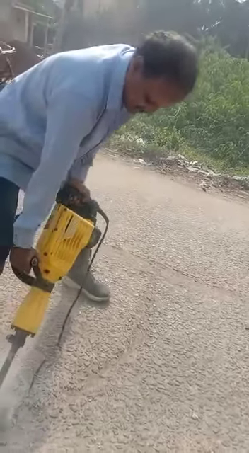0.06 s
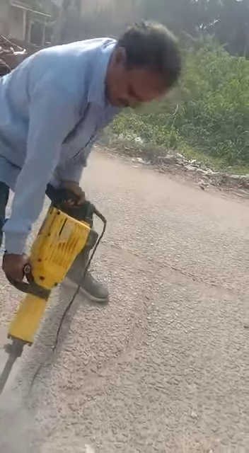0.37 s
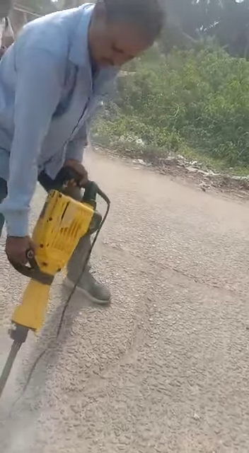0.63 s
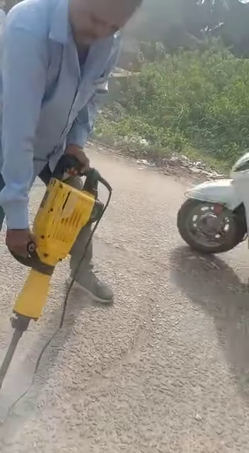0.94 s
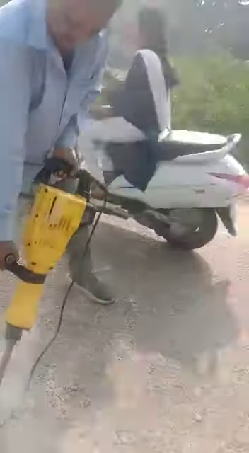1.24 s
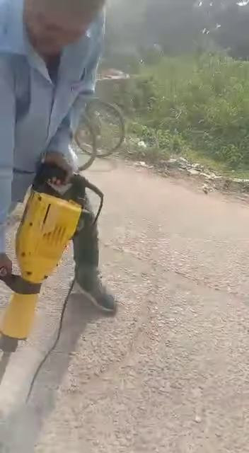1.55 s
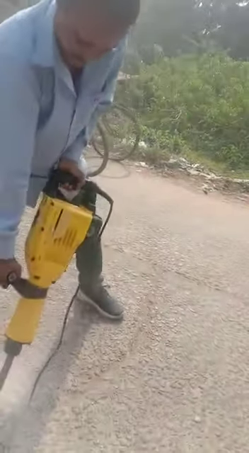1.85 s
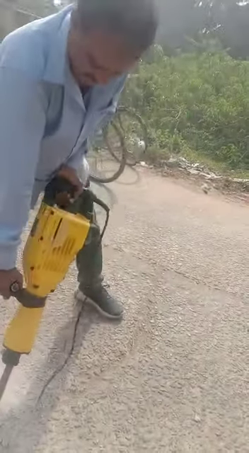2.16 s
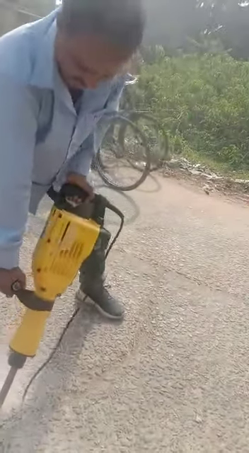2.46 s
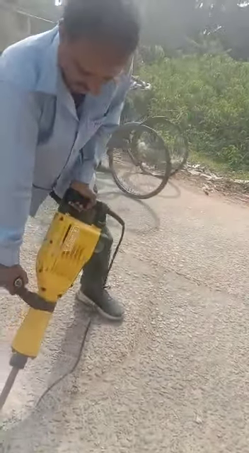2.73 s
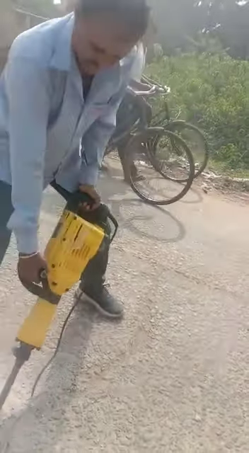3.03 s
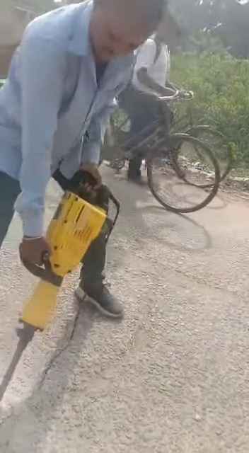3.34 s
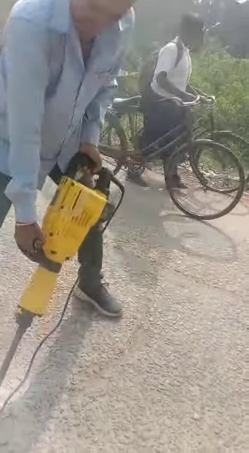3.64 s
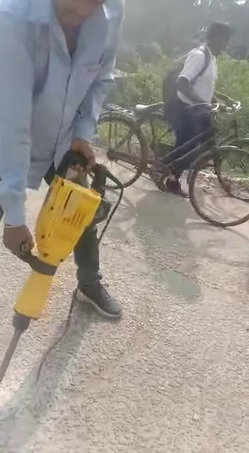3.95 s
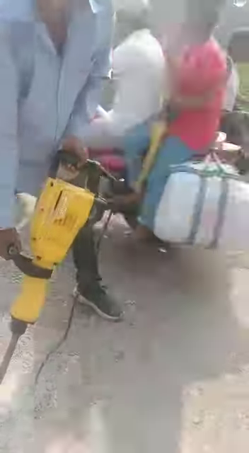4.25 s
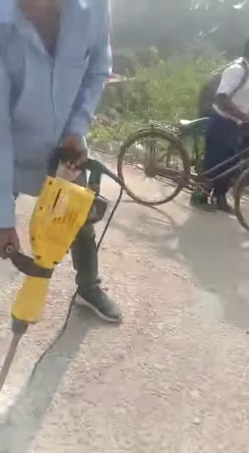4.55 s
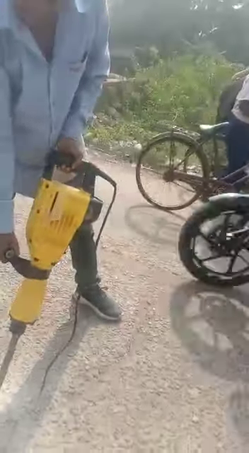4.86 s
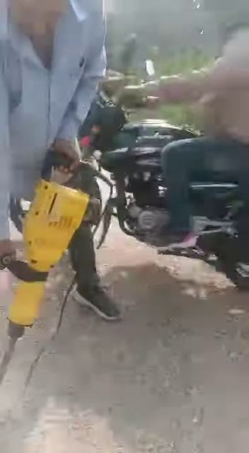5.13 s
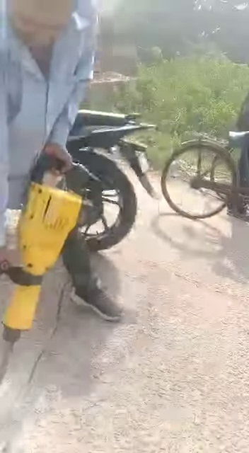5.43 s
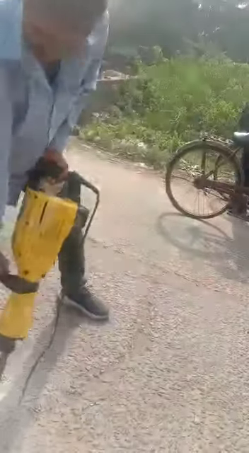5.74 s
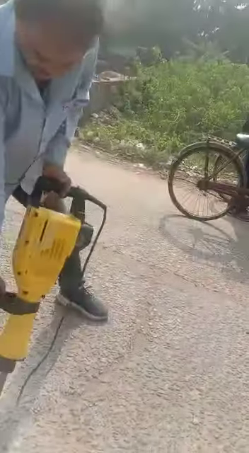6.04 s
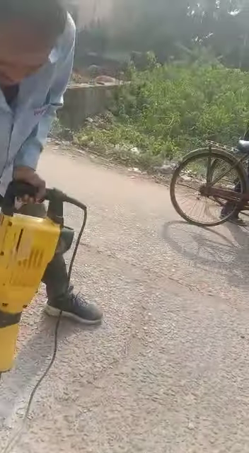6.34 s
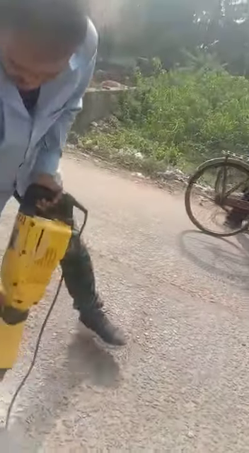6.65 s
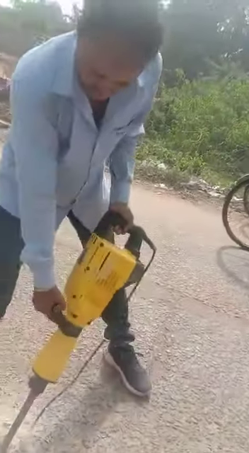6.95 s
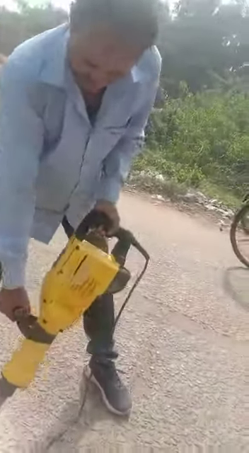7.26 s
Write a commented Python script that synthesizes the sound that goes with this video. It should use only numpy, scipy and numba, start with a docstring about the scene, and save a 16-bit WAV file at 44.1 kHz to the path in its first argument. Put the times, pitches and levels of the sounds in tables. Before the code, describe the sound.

An electric demolition hammer pounds a road in three rapid bursts, its motor whirring and chisel rattling between them, as motorcycles pass faintly.

```python
"""An electric demolition hammer pounds a road, a step or two from a phone's microphone.
Leaned on, the chisel strikes about 20 times a second: the ground thuds, grit crunches, the steel rings.
Eased off after each of three bursts, the motor speeds up, the housing hums and the loose chisel
rattles in its holder. Out in the street, scooters and motorcycles roll by with booming exhausts."""
import sys
import numpy as np
from scipy import signal
from scipy.fft import rfft, irfft, next_fast_len
from scipy.io import wavfile
from scipy.ndimage import uniform_filter1d, minimum_filter1d, map_coordinates
from numba import njit

SR = 44100
rng = np.random.default_rng(int(sys.argv[2]) if len(sys.argv) > 2 else 0)


def master(y):
    """Save y as 16-bit WAV."""
    cut = np.clip(np.atleast_2d(y).T, -1, 1)
    pcm = np.round(cut * 32767)  # scale
    wavfile.write(sys.argv[1], SR, pcm.astype(np.int16))


N = 321489
TIME = np.arange(N) / SR
STRIKE = np.arange(4096) / SR  # seconds into one blow
LOADED_HZ, FREE_HZ = 19.3, 26.8  # piston rate under load and running free
BOUNCE_S = 0.0067  # usual time the chisel rings clear after a blow

# Three bursts of hammering, first blow to last. Each row: time in seconds, blows per second.
FIRST_BURST = [(.022, 18.62), (.181, 18.43), (.287, 20.1), (.447, 17.55)]
SECOND_BURST = [(1.445, 22.96), (1.564, 26.98), (1.806, 22.95), (1.891, 24.23), (2.115, 20.26),
                (2.164, 21.75), (2.308, 19.4), (2.515, 19.49), (2.566, 18.09), (2.878, 20.77),
                (3.041, 15.75)]
THIRD_BURST = [(5.042, 26.3), (5.339, 27.48), (5.377, 26.38), (5.417, 22.58), (5.501, 24.78), (5.86, 20.09),
               (5.903, 23.88), (6.083, 21.08), (6.281, 19.17), (6.641, 19.78), (6.898, 19.15)]
BURSTS = [FIRST_BURST, SECOND_BURST, THIRD_BURST]
# How the loose chisel hangs. Each row: time in seconds, rattle and jangle offsets in dB,
# lower resonance in dB, upper resonance in Hz, its level in dB.
HANG = [(.55, -2.5, -0.5, -29, 3150, -27.5), (1, -0.5, -2, -27.5, 3280, -21.5),
        (1.4, 1.5, -1, -37, 2800, -32.5), (3.15, -0.5, -0.5, -29.5, 3150, -31),
        (3.6, 1, -1.5, -25, 3250, -37), (3.9, -1, -2.5, -31, 3020, -20.5), (4.1, 1, -3.5, -32, 3130, -30),
        (4.3, -4, -1, -32, 2580, -25), (4.65, -1, -0.5, -32, 2680, -26.5), (5, -1, -1, -30, 2570, -27),
        (7.05, -5, -1, -40, 3030, -22.5), (7.29, 2.5, -2.5, -46, 3030, -23)]
# Tone of the chisel's rattle and its brighter jangle. Each row: frequency in Hz, gain in dB.
RATTLE_TONE = [(1400, -13), (1850, -2.5), (2050, 0), (2230, 0.5), (2500, 1.5), (2900, 4.5), (3300, 4.5),
               (3800, 4.5), (4350, -2.5), (5200, -8.5)]
JANGLE_TONE = [(3700, -23.5), (4600, -2), (5050, 2.5), (5380, 7.5), (5850, 3), (6300, -6.5), (6720, -0.5),
               (7000, -8.5), (7500, -9.5), (8100, -23), (9000, -21.5), (9450, -16), (10200, -23),
               (12500, -36.5), (15300, -56)]


def chiselling():
    """Every blow drives the steel into the road; no two bite in quite the same way."""
    # Each row: time in seconds, relative force in dB, ground thud in dB.
    bite = [(.022, -2.5, -29.5), (.077, -1.5, -25), (.18, 0, -33.5), (.27, -3.5, -40), (.338, -1.5, -43),
            (.392, 1, -24), (.446, -4.5, -55), (1.446, -2, -25.5), (1.53, -5, -43), (1.6, -2, -32),
            (1.85, -0.5, -32.5), (1.97, 2.5, -27.5), (2.07, 0.5, -31.5), (2.18, 1, -24), (2.28, -2, -29),
            (2.37, 1, -24.5), (2.55, 4, -23.5), (2.676, 1, -32), (2.9, 3, -23), (3.04, -3.5, -35),
            (5.04, -2.5, -44), (5.16, -2.5, -38), (5.34, -5, -37), (5.378, 1.5, -30.5), (5.43, -8, -32),
            (5.52, 2.5, -40), (5.63, -1, -26.5), (5.81, -0.5, -30), (5.86, -10, -52), (5.95, -2.5, -34),
            (6.1, 2, -25.5), (6.43, -1, -25.5), (6.487, 3, -21), (6.54, -1, -27.5), (6.72, 1, -24.5),
            (6.9, -.5, -30.5)]
    # Patches of hard stone. Each row: middle in seconds, half length in seconds, hardness from 0 to 1.
    stone_patches = [(1.765, 0.19, 1.0), (5.24, 0.16, 0.82)]
    # Tone of each part of a blow. Each row: frequency in Hz, gain in dB.
    thud_tone = [(20, -23), (45, -28), (70, -3.5), (110, -1), (180, -1.5), (260, -1.5), (340, -2),
                 (430, -5), (700, -27)]
    crunch_tone = [(250, -18.5), (460, -2), (600, 0), (850, 2.5), (1010, 2.5), (1120, -1), (1270, 7),
                   (1420, -2.5), (1700, -3), (2000, -4), (2600, -7)]
    clank_tone = [(1600, -24), (2250, -2), (2550, -5), (2830, 3.5), (3100, 3.5), (3750, 0.5), (4200, -2),
                  (5000, -27)]
    clash_tone = [(3800, -48.5), (4600, -9), (5000, -6), (5290, -2), (5800, -5.5), (6150, -12.5),
                  (6600, -7.5), (7000, -12.5), (7450, -15), (7800, -25.5), (8300, -56.5)]
    chips_tone = [(7000, 2), (8200, -5.5), (8800, 2.5), (9400, 0), (10200, -0.5), (11300, -5.5),
                  (11900, -2.5), (13800, -10.5), (14800, 0), (15300, -9), (16000, -40)]
    starts = np.concatenate([blow_times(burst) for burst in BURSTS])
    force_db, thud_db = at(starts, bite)
    stone = sum(hardness * plateau(starts, middle, half) for middle, half, hardness in stone_patches)
    chance = rng.standard_normal((len(starts), 5)).T
    contact_s = 0.0027 * np.exp(0.23 * chance[0].clip(-2, 2) - 0.25 * stone)
    crunch_db = -24.5 + force_db + 1.6 * chance[1]
    clank_db = -24 + force_db + 1.6 * chance[2]
    clash_db = -16.5 + 0.25 * force_db + 1.6 * chance[3] + 2.5 * stone
    chips_db = -33.5 + force_db + 1.6 * chance[4]
    thud = contact(contact_s, rise=0.00066, t60=0.019, tail_db=-26, tail_t60=0.062)
    thud = colour(thud, thud_tone, uneven_db=1.5)
    crunch = contact(0.27 * contact_s, rise=0.00032, t60=0.029, tail_db=-23, tail_t60=0.12)
    crunch = colour(crunch, crunch_tone, uneven_db=3)
    clank = contact(0.18 * contact_s, rise=0.00015, t60=0.021, tail_db=-13, tail_t60=0.057)
    clank = colour(clank, clank_tone, uneven_db=3)
    clash = contact(0.27 * contact_s, rise=0.0001, t60=0.016, tail_db=-11, tail_t60=0.11)
    clash = colour(clash, clash_tone, uneven_db=3.5)
    chips = contact(0.9 * contact_s, rise=0.00094, t60=0.019, tail_db=-13.5, tail_t60=0.22)
    chips = colour(chips, chips_tone, uneven_db=2)
    clash = sized(clash, 0) + sized(ping(contact_s), -17 + 22.5 * stone)
    ring_db, free_s = bounces(starts, force_db, stone)
    clash_db -= 57 * (free_s - BOUNCE_S)  # a longer bounce clashes less
    road = sized(thud, thud_db) + sized(crunch, crunch_db) + sized(chips, chips_db)
    steel = sized(clank, clank_db) + sized(clash, clash_db) + sized(chisel_ring(free_s), ring_db)
    return place(starts, road + steel)


def blow_times(burst):
    """One blow for each full stroke of the piston."""
    times, hz = np.transpose(burst)
    t = TIME[(TIME >= times[0]) & (TIME <= times[-1])]
    strokes = np.cumsum(np.interp(t, times, hz)) / SR
    return np.interp(np.arange(round(strokes[-1]) + 1), strokes, t)


def contact(length_s, rise, t60, tail_db, tail_t60):
    """One row per blow: dense micro-impacts during contact, then a quick fall and a faint tail."""
    decay = fade(STRIKE - length_s[:, None], t60) + undb(tail_db) * fade(STRIKE, tail_t60)
    return (1 - np.exp(-STRIKE / rise)) * decay * rng.standard_normal(decay.shape)


def ping(contact_s):
    """The short, bright note that a blow narrows into on hard stone."""
    hz = 5350 * (1 + 0.0086 * rng.standard_normal((len(contact_s), 1)))
    attack = 1 - np.exp(-STRIKE / 0.00061)
    return np.sin(2 * np.pi * hz * STRIKE) * attack * fade(STRIKE - 0.99 * contact_s[:, None], t60=0.023)


def bounces(starts, force_db, stone):
    """How loud and long the chisel rings after each blow: stone deadens it, a clink lasts longer."""
    # Each row: time in seconds, ring level in dB, free ringing in seconds.
    clinks = [(.077, -18.5, 0.026), (.446, -21.5, 0.054), (1.446, -33, 0.032), (1.485, -30, .02),
              (2.727, -22, 0.014), (2.778, -13, 0.015), (2.827, -14, 0.016), (2.927, -19.5, 0.032),
              (2.978, -26, 0.045), (3.041, -29, 0.027), (5.041, -25, 0.042), (5.081, -21.5, 0.023),
              (5.762, -21.5, 0.032), (5.808, -26, 0.052), (5.86, -26, 0.036), (5.905, -21.5, 0.024),
              (5.945, -24, 0.013), (6.228, -21, 0.018), (6.743, -26, 0.035), (6.794, -26, 0.035),
              (6.845, -22, 0.031), (6.898, -17.5, 0.046)]
    ring_db = -23.5 + 0.45 * force_db - 16 * stone
    free_s = BOUNCE_S * np.exp(0.3 * rng.standard_normal(len(starts)).clip(-2, 2))
    for when, db, length in clinks:
        blow = np.argmin(np.abs(starts - when))
        ring_db[blow], free_s[blow] = db, length
    return ring_db, free_s


def chisel_ring(free_s, detune=0.002, waver_rad=0.78, seated_db=-27):
    """The bar rings as it bounces clear, wavers as it chatters in its holder, and is damped as it seats."""
    # Each row: frequency in Hz, relative level in dB, seconds to fall 60 dB.
    modes = [(4560, -18, 0.25), (6816, -10, 0.03), (6815, -3.5, 0.35), (7490, -16, 0.14), (9350, -22, 0.2),
             (12200, -35, 0.16), (15230, -26, 0.13)]
    chance = rng.standard_normal((len(free_s), 2 + 2 * len(modes)))
    tuning = 1 + detune * chance[:, :1]
    ring = 0
    for k, (hz, db, t60) in enumerate(modes):
        noise = rng.standard_normal((len(free_s), len(STRIKE)))
        drift = unit(signal.fftconvolve(noise, np.hanning(SR // 70)[None], "same", axes=1))
        angle = 2 * np.pi * (hz * tuning * STRIKE + chance[:, 2 + 2 * k, None]) + waver_rad * drift
        mode_db = db + 3.5 * chance[:, 3 + 2 * k, None].clip(-2, 2) + 2.5 * drift[:, ::-1]
        ring += undb(mode_db) * np.sin(angle) * fade(STRIKE, t60)
    damping = np.maximum(fade(STRIKE - free_s[:, None], t60=0.015), undb(seated_db))
    return ring * (1 - np.exp(-STRIKE / 0.00014)) * damping


def motor(spin_up_s=0.42, loosen_s=0.043, press_s=0.015):
    """Off load the motor speeds up. Gives piston rate, chisel looseness (0-1), seconds running free."""
    idle_s, loose, stroke_hz = np.zeros(N), np.zeros(N), np.full(N, LOADED_HZ)
    for burst in BURSTS:
        first, last = burst[0][0], burst[-1][0]
        idle_s = np.where(TIME < first, idle_s, np.maximum(TIME - last, 0))
        # the chisel is pressed home just before a burst and shakes loose just after it
        loose *= np.clip((first - 0.0068 - TIME) / press_s, 0, 1)
        loose = np.where(TIME < last, loose, 1 - np.exp(-np.maximum(idle_s - 0.023, 0) / loosen_s))
        rising_hz = FREE_HZ - (FREE_HZ - LOADED_HZ) * np.exp(-idle_s / spin_up_s)
        stroke_hz = np.select([TIME < first, TIME < last], [stroke_hz, at(TIME, burst)[0]], rising_hz)
    return stroke_hz, loose, idle_s


def machine(stroke_hz, loose, idle_s):
    """The running hammer drones, rattles and jangles, louder between the bursts."""
    faster_hz = stroke_hz - LOADED_HZ
    hang_rattle_db, hang_jangle_db, *_ = at(TIME, HANG)
    drone_db = blend(-43 + 0.75 * faster_hz, -34.5 + 0.85 * faster_hz, loose)
    rattle_db = blend(-38 + faster_hz, -22 + 0.12 * faster_hz + hang_rattle_db, loose)
    jangle_db = blend(-34 - 0.05 * faster_hz, -25.5 + 0.7734 * faster_hz + hang_jangle_db, loose)
    # Each row: frequency in Hz, gain in dB.
    drone_tone = [(50, -26), (130, -12.5), (260, -10.5), (350, -2.5), (445, -3), (520, -6.5), (610, -10),
                  (720, -6), (810, 4.5), (900, -3.5), (1040, -2), (1280, -3.5), (1420, -8.5), (1750, -6),
                  (2300, -17.5)]
    impacts = chatter(stroke_hz)
    drone = undb(drone_db) * shaken(impacts, drone_tone, t60=0.02, air_share=0.5)
    rattle = undb(rattle_db) * road_reflection(shaken(impacts, RATTLE_TONE, t60=0.0042, air_share=0.32))
    jangle = undb(jangle_db) * shaken(impacts, JANGLE_TONE, t60=0.026, air_share=0.089)
    return drone + rattle + jangle + gear_whine(stroke_hz, loose, idle_s) + rasps(impacts, loose)


def chatter(stroke_hz, per_s=920, bunching=0.53, scatter_db=3.5):
    """Energy of small impacts between loose parts, crowding together once in each piston stroke."""
    strokes = np.cumsum(stroke_hz) / SR
    odds = per_s / SR * np.exp(bunching * np.cos(2 * np.pi * strokes))
    return (rng.random(N) < odds) * undb(scatter_db * rng.standard_normal(N).clip(-2, 2)) ** 2


def shaken(impacts, tone, t60, air_share):
    """A part of the machine rung by the impacts, over the even rush of its fan."""
    energy = np.maximum(signal.fftconvolve(impacts, fade(STRIKE, t60) ** 2)[:N], 0)
    energy /= uniform_filter1d(energy, SR // 8) + 1e-9
    envelope = np.sqrt(np.abs(air_share + (1 - air_share) * energy))
    return unit(colour(envelope * rng.standard_normal(N), tone))


def road_reflection(x, lag_s=0.004, sway_s=0.00005, share=0.28):
    """A second path to the microphone, off the road; its delay sways as the hammer is moved about."""
    sway = map_coordinates(rng.standard_normal(24), [TIME * 2], order=3, mode="nearest")
    return unit(x + share * np.interp(TIME - lag_s - sway_s * sway, TIME, x))


def rasps(impacts, loose):
    """Two resonances stand out as the chisel comes loose; the upper one shifts with the way it hangs."""
    _, _, lower_db, upper_hz, upper_db = at(TIME, HANG)
    lower = rasp(impacts, hz=2250, width_hz=123, t60=0.0072)
    upper = rasp(impacts, hz=blend(2850, upper_hz, loose), width_hz=360, t60=0.016)
    return undb(blend(-54, lower_db, loose)) * lower + undb(blend(-37.5, upper_db, loose)) * upper


def rasp(impacts, hz, width_hz, t60):
    """The chisel's impacts ring one narrow resonance."""
    envelope = np.sqrt(np.abs(signal.fftconvolve(impacts, fade(STRIKE, t60) ** 2)[:N]))
    return resonance(envelope * rng.standard_normal(N), hz, width_hz, 3 * width_hz)


def clacks():
    """Now and then the loose chisel hits its retainer hard."""
    # Each row: start in seconds, relative peak level in dB.
    hits = [(0.6784, -6), (0.769, -5.5), (0.8191, -1.5), (3.314, -2), (3.3803, -4), (3.449, -3.5),
            (3.66, -9), (3.6724, -10), (3.6934, -12), (3.8982, -4), (4.3667, -7.5), (7.113, -4.5),
            (7.194, -7.5)]
    starts, peak_db = np.transpose(hits)
    knock = contact(np.full(len(starts), 0.001), rise=0.0006, t60=0.035, tail_db=-16, tail_t60=0.055)
    rows = colour(knock, RATTLE_TONE, uneven_db=2.5) + colour(knock, JANGLE_TONE, uneven_db=2.5)
    return place(starts, [undb(db - 0.5) * row / np.abs(row).max() for db, row in zip(peak_db, rows)])


def housing_hum(loose, idle_s, swell_s=0.18):
    """As the motor nears full speed, the shaking sets the housing's lowest modes humming."""
    # Each row: frequency in Hz, width in Hz, relative level in dB.
    modes = [(433, 32, -0.5), (488.4, 15, -2), (806, 200, -1.5), (1286, 40, -2.5)]
    hum = sum(undb(db) * resonance(rng.standard_normal(N), hz, width, 4 * width) for hz, width, db in modes)
    return unit(hum) * loose * undb(-32.5 - 39 * np.exp(-idle_s / swell_s))


def gear_whine(stroke_hz, loose, idle_s, cycles_per_stroke=533, fade_s=0.16):
    """The gears give a thin, rising whine while the motor pulls up to speed."""
    wobble = unit(uniform_filter1d(rng.standard_normal(N), SR // 200))
    hz = cycles_per_stroke * stroke_hz * (1 + 0.0025 * wobble)
    return undb(-51) * loose * np.exp(-idle_s / fade_s) * np.sin(2 * np.pi * np.cumsum(hz) / SR)


def motorcycles():
    """Single-cylinder engines pass at low revs: each firing booms in the silencer, and tyres rumble."""
    # Each row: middle and half length in seconds, firing rate and exhaust resonance in Hz,
    # exhaust and tyre levels in dB.
    passes = [(.98, .53, 26.4, 81, -40, -48), (3.3, 0.41, 26.9, 102, -52, -45),
              (4.35, 1, 26.5, 102, -50.5, -50.5), (5.7, 0.32, 21.9, 111, -45, -42.5),
              (7.09, 0.13, 22.7, 110, -36.5, -41)]
    tyre_tone = [(45, -10), (85, 1.5), (130, -1.5), (200, -6.5), (400, -23.5)]
    out = np.zeros(N)
    for middle, half, firing_hz, pipe_hz, exhaust_db, tyres_db in passes:
        cycles = np.cumsum(firing_hz * (1 + 0.058 * rng.standard_normal(N))) / SR
        firings = np.diff(np.floor(cycles), prepend=0) * undb(1.5 * rng.standard_normal(N))
        boom = resonance(firings + 1e-18, pipe_hz, width_hz=31, skirt_hz=41)
        out += plateau(TIME, middle, half) * (boom * undb(exhaust_db) + rush(tyre_tone) * undb(tyres_db))
    return out


def street():
    """A faint wash of air and far traffic, and a few dull scuffs on the road."""
    # Each row: middle in seconds, half length in seconds, level in dB.
    scuffs = [(2.593, 0.0071, -30), (4.186, 0.026, -34.5), (6.423, 0.061, -40), (6.575, 0.083, -34.5)]
    wash = rush([(20, -21), (50, -11), (110, -9), (300, -10), (1000, 0)])
    scuff = rush([(60, -21), (130, 1), (215, 4), (300, 2), (420, -4), (800, -7)])
    swell = sum(undb(db) * np.exp(-((TIME - middle) / half) ** 2) for middle, half, db in scuffs)
    return undb(-61) * wash + swell * scuff


def rush(tone):
    """Steady noise at rms 1, shaped by (Hz, dB) points."""
    return unit(colour(rng.standard_normal(N), tone))


def colour(x, tone, uneven_db=0):
    """Causal filter through (Hz, dB) points; uneven_db ripples it at random, anew for each row of x."""
    n = next_fast_len(x.shape[-1] // 2 + 1) * 2
    f = np.arange(n // 2 + 1) * SR / n + 1
    hz, db = np.transpose(tone)
    gain_db = np.interp(np.log(f), np.log(np.r_[hz[0] / 2, hz, hz[-1] * 2]),
                        np.r_[db[0] - 30, db, db[-1] - 30])
    if uneven_db:
        knots = np.linspace(0, np.sqrt(SR / 2), 80)
        ripple = np.array([np.interp(np.sqrt(f), knots, rng.standard_normal(len(knots))) for _ in x])
        gain_db = gain_db + uneven_db * ripple
    # minimum phase, so nothing sounds ahead of a blow
    cepstrum = irfft(np.log(undb(gain_db)))
    cepstrum[..., 1:n // 2] *= 2
    cepstrum[..., n // 2 + 1:] = 0
    return irfft(rfft(x, n) * np.exp(rfft(cepstrum)))[..., :x.shape[-1]]


def resonance(x, hz, width_hz, skirt_hz):
    """A resonance at rms 1; a second, wider band-pass steepens its skirts."""
    centre_hz = hz + np.zeros(N)
    return unit(band_pass(band_pass(x, centre_hz, width_hz), centre_hz, skirt_hz))


@njit
def band_pass(x, hz, width_hz):
    """State-variable band-pass whose centre can move."""
    y, band_state, low_state = np.empty(len(x)), 0., 0.
    for i in range(len(x)):
        g, damping = np.tan(np.pi * hz[i] / SR), width_hz / hz[i]
        band = (band_state + g * (x[i] - low_state)) / (1 + g * (g + damping))
        band_state, low_state = 2 * band - band_state, low_state + 2 * g * band
        y[i] = damping * band
    return y


def place(starts, sounds):
    """Mix each sound in at its start in seconds."""
    out = np.zeros(N)
    for start, sound in zip(starts, sounds):
        i = int(start * SR)
        out[i:i + len(sound)] += sound[:N - i]
    return out


def at(t, table):
    """Each column of a table, joined by straight lines and read at times t."""
    times, *columns = np.transpose(table)
    return [np.interp(t, times, column) for column in columns]


def blend(seated, hanging, loose):
    """Slide from the seated value to the hanging one as the chisel comes loose."""
    return seated + loose * (hanging - seated)


def plateau(t, middle, half):
    """A flat-topped swell from 0 to 1 and back."""
    return np.exp(-((t - middle) / half) ** 4)


def fade(t, t60):
    """Exponential decay, 60 dB in t60 seconds."""
    return np.exp(-np.log(1000) * np.maximum(t, 0) / t60)


def sized(rows, db):
    """Give each row its rms level over the first 20 ms."""
    return rows * (undb(db) / np.sqrt(np.mean(rows[:, :SR // 50] ** 2, axis=1)))[:, None]


def unit(x):
    """Scale to rms 1."""
    return x / np.sqrt(np.mean(x ** 2) + 1e-18)


def undb(db):
    """Decibels to gain."""
    return 10 ** (np.asarray(db) / 20)


def scene():
    """The hammer close to the microphone, the street behind it, in mono."""
    stroke_hz, loose, idle_s = motor()
    hammer = chiselling() + machine(stroke_hz, loose, idle_s) + housing_hum(loose, idle_s) + clacks()
    return (hammer + motorcycles() + street())[None]


def record(dry):
    """The phone's limiter holds down the peaks of the blows; the top is cut above 15.5 kHz."""
    gain = np.minimum(1, 0.92 / (np.abs(dry) + 1e-9))
    gain = uniform_filter1d(minimum_filter1d(gain, size=45), size=45)
    return signal.sosfilt(signal.ellip(8, 0.2, 70, 15500, fs=SR, output="sos"), dry * gain)


dry = scene()
out = record(dry)
master(out)
```